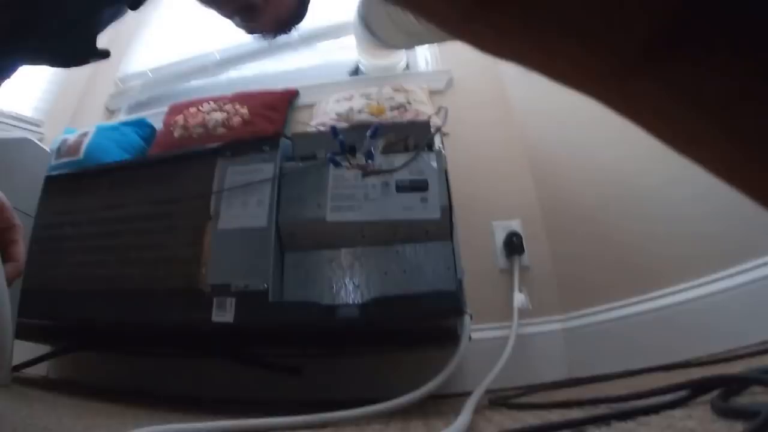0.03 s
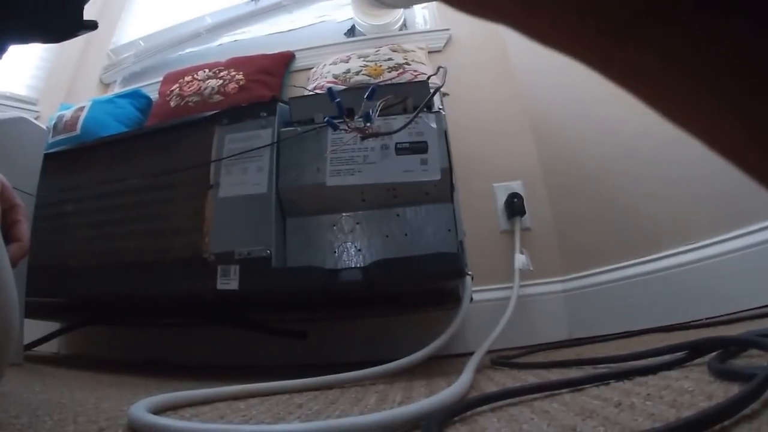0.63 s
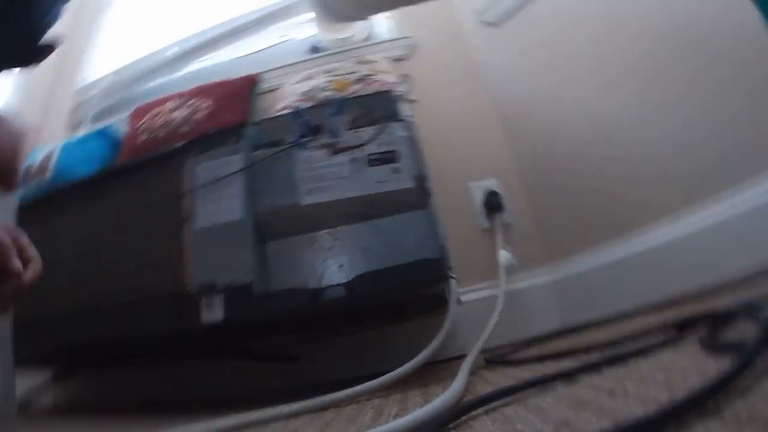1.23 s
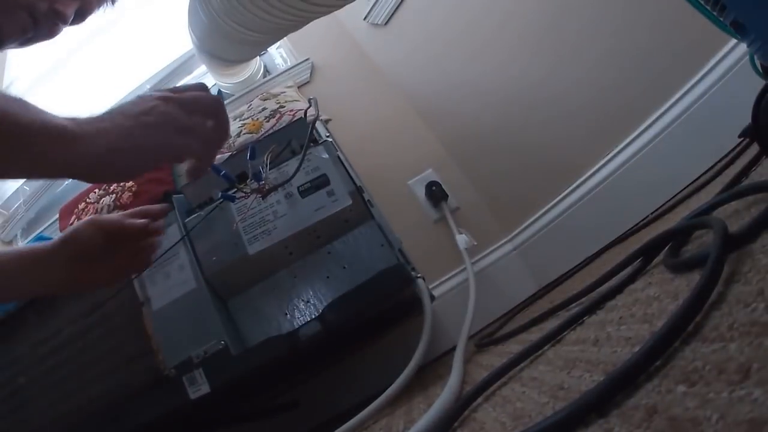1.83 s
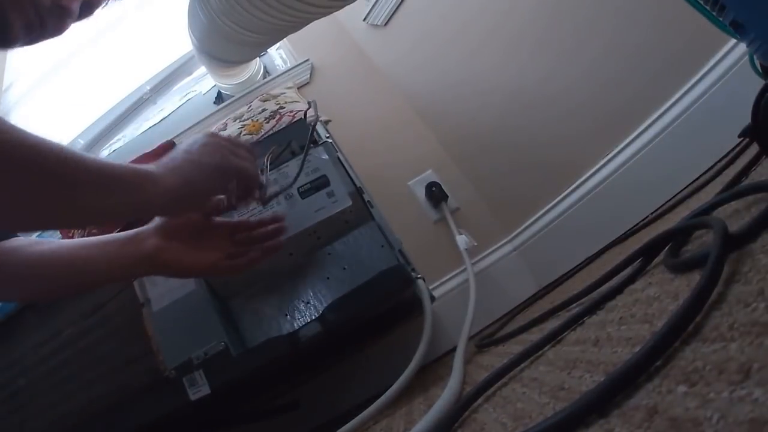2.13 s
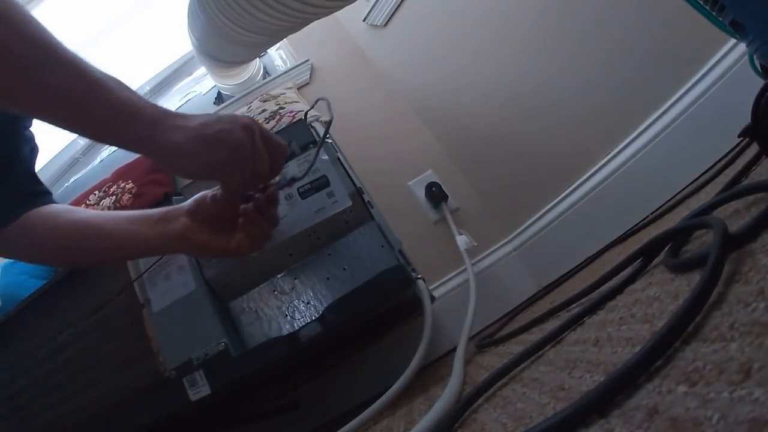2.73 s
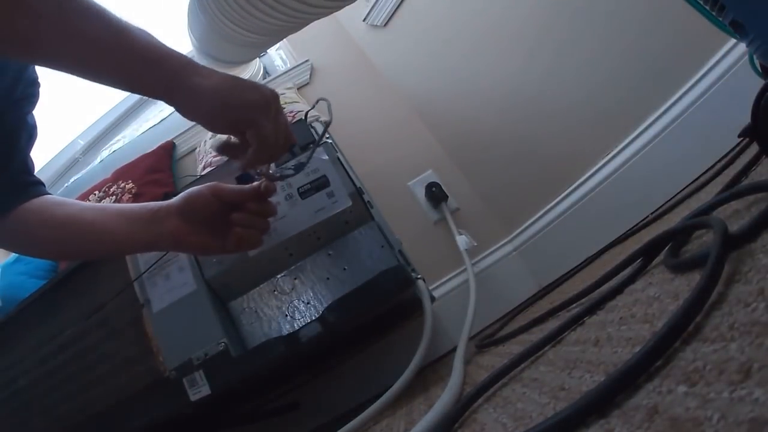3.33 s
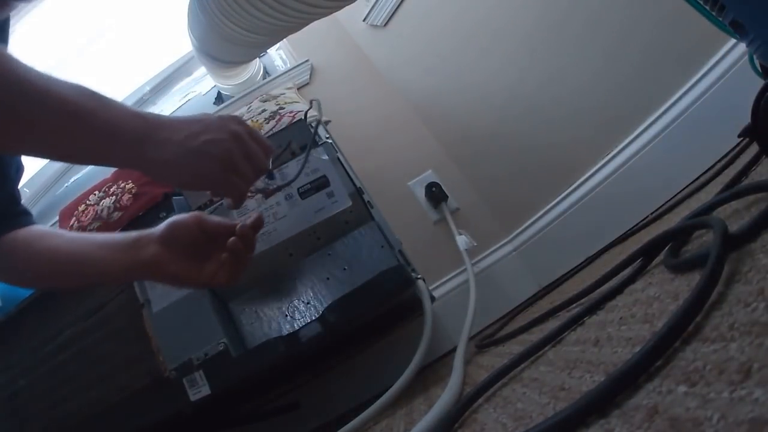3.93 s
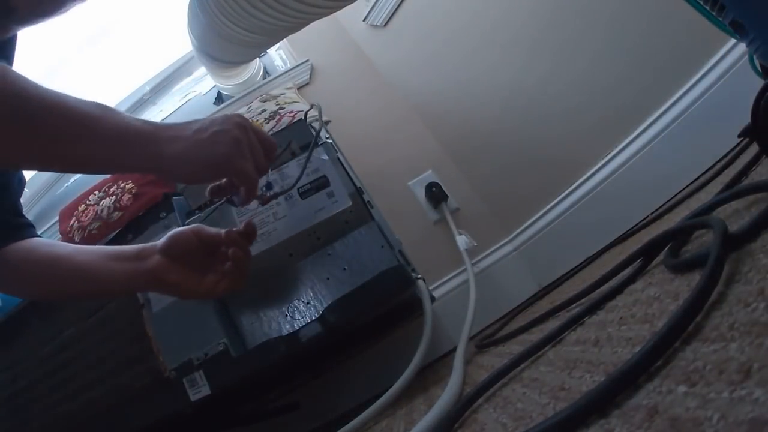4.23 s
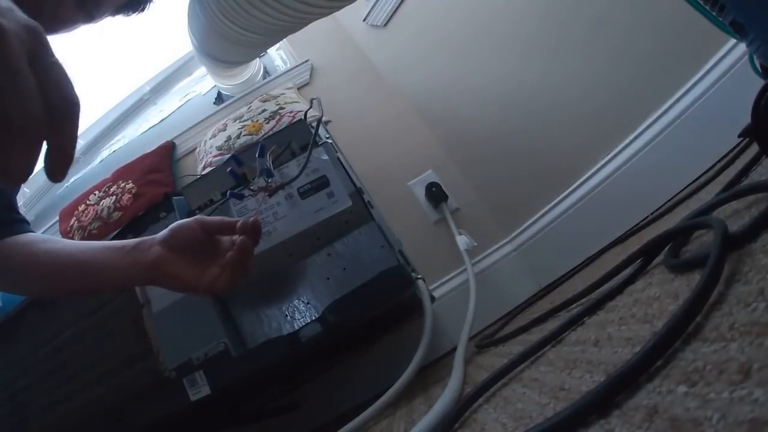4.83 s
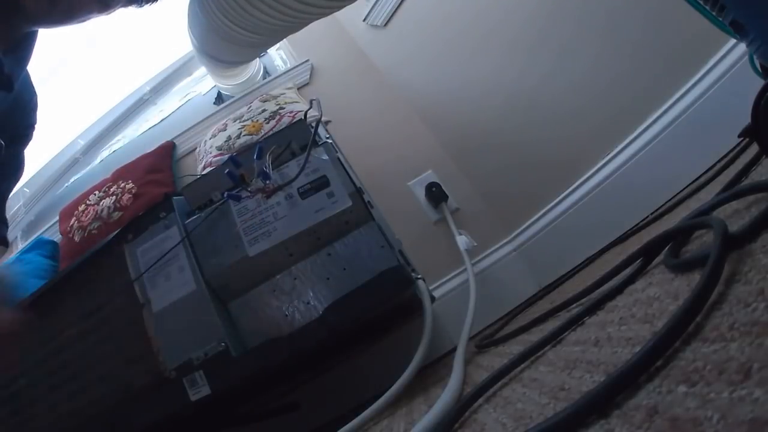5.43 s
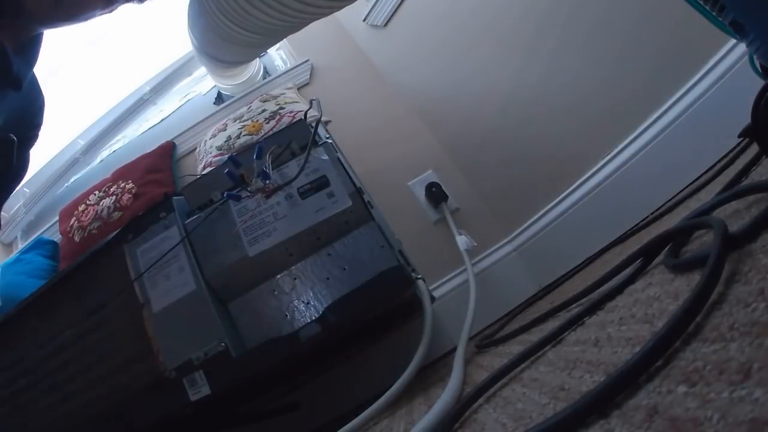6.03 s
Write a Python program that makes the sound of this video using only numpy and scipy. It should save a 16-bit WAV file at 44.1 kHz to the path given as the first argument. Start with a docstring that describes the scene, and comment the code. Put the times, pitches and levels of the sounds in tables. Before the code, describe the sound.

A wall air conditioner runs for all six seconds in a small room: a low, slightly throbbing hum with rushing fan air, faint panel buzz and a thin hiss. The microphone starts in the hand, with a clack right at the start, finger rubbing, and a few light bumps around 0.6 seconds. At about 1.4 seconds it scrapes over the floor and stops with a loud, sharp knock at 1.5, followed by a plastic clack at 1.6. The background drops at the knock and recovers over the next couple of seconds, with the hum stronger from the floor. Wires and small parts tick lightly near 1.7 and 1.8 seconds, faintly again around 4.1 and 4.4, and near 5.9. Soft, low thuds come through the floor at scattered moments. Clothes brush and a sleeve swishes quietly from about 4.7 to 5.5 seconds.

```python
"""A small room, heard from a camera's microphone. An opened wall air conditioner runs throughout:
compressor and mains hum beat against each other over the fan's rush and a faint buzz of panels.
At first the camera is in the hand, rubbed and bumped. Near 1.4 s it scrapes over the floor and stops
with a knock that ducks its gain control; its mount clacks, and the level takes seconds to recover.
Then, from the floor, we hear someone handle the wiring: small ticks, brushing clothes, soft thuds."""
import sys
import numpy as np
from scipy import signal
from scipy.fft import rfft, irfft, next_fast_len
from scipy.io import wavfile
from scipy.ndimage import uniform_filter1d, minimum_filter1d

SR = 44100
rng = np.random.default_rng(int(sys.argv[2]) if len(sys.argv) > 2 else 0)


def generate_wav(signal):
    """Clip the signal to [-1, 1] and save it as 16-bit WAV at the path in sys.argv[1]."""
    frames = np.transpose(np.atleast_2d(signal))
    scaled = np.clip(frames, -1, 1) * 32767
    pcm = np.round(scaled).astype(np.int16)
    wavfile.write(sys.argv[1], SR, pcm)


N = 268260
TIME = np.arange(N) / SR
SHAFT_HZ, MAINS_HZ = 56.39, 60.0
# In the hand the microphone gets less hum and more air: levels against its place on the floor.
CARRIED_HUM_DB, CARRIED_BOOM_DB, CARRIED_RUSH_DB, CARRIED_HISS_DB = -6.5, 2.5, 0, 1
HUM_COLUMN, BOOM_COLUMN, RUSH_COLUMN = 2, 3, 4  # of LEVEL_SWINGS

# Brief dips and swells of hum, boom and rush, some deepening the drop after the knock.
# Each row: centre in seconds, length in seconds, change of hum, of boom and of rush in dB.
LEVEL_SWINGS = [(0.205, 0.68, -1, -3, -3), (0.55, 0.12, 4, 3.5, -1), (1.185, 0.43, 0, 1, 2),
                (1.566, 0.11, 1, -3.5, -2.5), (1.73, 0.22, -2, 1.5, 1.5), (1.93, 0.49, -0.5, -6.5, -3),
                (2.23, 0.48, -2.5, 5, 1), (3.615, 0.27, -7.5, 1.5, -0.5), (4.757, 0.33, -6, 0.5, 0),
                (5.738, 0.51, -1.5, -3, -1)]
# Refrigerant hiss. Each row: frequency in Hz, relative level in dB.
GAS_SPECTRUM = [(1000, -14), (2100, 13.5), (2500, 1.5), (3000, 10), (4200, 3.5), (4800, 5.5), (5850, 6.5),
                (6500, -3.5), (7500, -11), (8700, -15), (10200, -23), (11300, -20), (12700, -11.5),
                (14000, -22), (15000, -44)]
# Buzzing panels. Each row: frequency in Hz, relative level of the lines there in dB.
PANEL_SPECTRUM = [(450, -2), (620, 1.5), (850, 1.5), (1050, 0.5), (1350, -5.5), (1660, -8.5)]
# Fan and casing tones. Each row: frequency in Hz, level in dB.
FAN_TONES = [(59.1, -50), (137.0, -49), (230.8, -38), (295.5, -45), (367.2, -43.5), (804.0, -59.5)]
# Air booming in the casing. Each row: frequency in Hz, relative level in dB.
BOOM_SPECTRUM = [(15, -35.5), (40, -22), (70, -21), (100, -15), (150, -0.5), (195, -6.5), (250, -4),
                 (325, 3.5), (375, -5.5), (440, -13), (600, -22), (1200, -68), (14000, -89.5)]
# Air rushing through the fins. Each row: frequency in Hz, relative level in dB.
RUSH_SPECTRUM = [(250, -30), (480, 7), (620, 1.5), (900, -3.5), (1050, -3.5), (1400, -5), (1650, -9.5),
                 (2000, -14.5), (2500, -18.5), (4500, -57)]
# Compressor hum. Each row: multiple of the shaft rate, level in dB.
SHAFT_ORDERS = [(0.5, -54.5), (1.5, -44.5), (2, -25), (2.5, -50.5), (3, -59.5), (4, -45), (5, -38),
                (7, -48.5), (8, -54), (9, -49.5), (10, -55), (10.5, -60), (12, -58.5), (14, -59), (24, -60),
                (33, -64.5)]
# Brief dips of the deepest hum. Each row: centre in seconds, length in seconds, change in dB.
DEEP_DIPS = [(2.29, .13, -18), (3.0, 0.089, -13), (3.75, .25, 0), (4.12, 0.11, -10), (5.1, .28, -22),
             (5.58, 0.14, -14)]
# The motor's magnetic hum. Each row: multiple of the mains, level in dB.
MAINS_HARMONICS = [(2, -40), (4, -46), (6, -43)]
# The rotor modulates twice the mains. Each row: shaft multiples above that tone, level in dB.
ROTOR_SIDEBANDS = [(1, -46.5), (2, -40.5), (4, -41)]
# Weight shifting on the floor. Each row: peak in seconds, length in seconds, level in dB.
FLOOR_THUDS = [(0.065, 0.14, -35), (0.264, 0.12, -31), (0.55, 0.096, -33), (0.706, 0.043, -22),
               (1.023, 0.15, -31.5), (1.39, 0.064, -26.5), (1.533, 0.049, -24.5), (1.907, 0.13, -28),
               (2.052, 0.085, -33), (2.187, 0.049, -24), (3.313, 0.18, -31), (3.487, 0.058, -28),
               (4.014, 0.37, -39.5), (4.287, 0.14, -27), (4.565, 0.12, -28.5), (4.692, 0.087, -29.5),
               (5.384, 0.042, -24.5)]
# The floor's rumble. Each row: frequency in Hz, relative level in dB.
FLOOR_SPECTRUM = [(15, -4), (35, -8.5), (55, 1.5), (85, 1.5), (120, -2.5), (165, -7.5), (205, -23),
                  (400, -62), (1000, -88.5)]
# Clothes brush as the arms move. Each row: peak, rise and fall in seconds, level in dB.
CLOTH_STROKES = [(.62, 0.17, 0.39, -51.5), (2.88, 0.045, 0.073, -60), (4.765, 0.035, 0.16, -43),
                 (5.41, 0.018, 0.16, -49.5)]
# Fabric on skin. Each row: frequency in Hz, relative level in dB.
CLOTH_SPECTRUM = [(800, 6.5), (2000, 3), (3900, -5.5), (4500, 0), (5850, -2), (6500, -9), (7500, -13),
                  (8500, -12.5), (10500, -22.5), (13000, -21), (15000, -33)]
# A sleeve swishes as the arm draws back. Each row: peak, rise and fall in seconds, level in dB.
SLEEVE_STROKES = [(4.74, 0.013, 0.16, -52.5), (4.93, 0.11, 0.2, -57)]
# The sliding sleeve. Each row: frequency in Hz, relative level in dB.
SLEEVE_SPECTRUM = [(2500, -17), (4050, -14), (4350, 0.5), (4900, 3.5), (5500, 6), (6100, -2), (7000, -19.5),
                   (8400, -13), (10000, -27.5), (14000, -33)]
# Wires and small parts tick. Each row: start in seconds, ring level in dB, ring pitch in Hz,
# ring t60 in seconds, snap level in dB, snap t60 in seconds.
WIRE_TICKS = [(1.6825, -31, 3040, 0.013, -49, .013), (1.8122, -29, 2880, 0.027, -34, 0.021),
              (4.109, -50, 3020, .01, -46, .013), (4.416, -37, 4740, 0.006, -39, 0.045),
              (5.893, -38.5, 2900, 0.0097, -48, .013)]
# The camera's shell. Each row: frequency in Hz, relative level in dB, t60 in seconds.
SHELL_MODES = [(406, -10.5, 0.032), (1030, -8.5, 0.017), (1705, -1, 0.011), (1890, 0.5, 0.012),
               (2230, -1.5, 0.012), (2680, -4, 0.0062), (2990, 1.5, 0.0069), (4160, -9, 0.0033),
               (4820, -15.5, 0.0078), (5620, -6.5, 0.0057), (8500, -24.5, 0.0043), (9100, -29, 0.0067),
               (12800, -14, .002)]
# Its loose mount. Each row: frequency in Hz, relative level in dB, t60 in seconds.
MOUNT_MODES = [(307, -2.5, 0.038), (1090, -7, 0.0078), (1520, -1, 0.0092), (1840, 5.5, 0.0074),
               (2260, -2, 0.013), (2690, 1.5, 0.005), (2900, 3, 0.0093), (3950, -5.5, 0.0076),
               (4280, -2.5, 0.0061), (5200, -3.5, 0.0029), (5770, -12.5, 0.0094)]
# The camera slides in quickening shoves. Each row: peak, rise and fall in seconds, relative level in dB.
SHOVES = [(1.448, 0.063, 0.015, -30.5), (1.483, 0.03, 0.012, -24), (1.505, 0.015, 0.009, -23.5)]
# Resonances of the slide. Each row: frequency in Hz, nominal width in Hz, relative level in dB.
CHATTER_BANDS = [(1790, 81, -11.5), (2023, 270, 3), (2205, 170, -3.5), (2560, 180, -5.5), (2920, 370, -10)]
# The camera's body drags on the floor. Each row: peak, rise and fall in seconds, level in dB.
DRAG_STROKES = [(1.39, 0.05, 0.061, -29), (1.5, 0.034, 0.02, -37)]
# The grumble of that drag. Each row: frequency in Hz, relative level in dB.
DRAG_SPECTRUM = [(100, -8.5), (215, -12), (300, 9), (500, 3.5), (750, -8.5), (1100, -7), (1500, -15),
                 (3000, -43), (14000, -69)]
# Fingers on the camera. Each row: peak, rise and fall in seconds, relative level in dB.
FINGER_STROKES = [(.042, 0.016, 0.025, -37), (.108, 0.043, 0.024, -34.5), (.15, 0.03, 0.038, -29),
                  (.29, 0.024, 0.036, -47), (.533, 0.062, 0.1, -40.5), (.678, 0.0095, 0.016, -40)]
# Skin dragging on plastic. Each row: frequency in Hz, relative level in dB.
SKIN_SPECTRUM = [(200, -17), (700, -16), (1300, 6), (2000, -10), (2750, 2.5), (3300, -10), (4500, -12.5),
                 (5700, -8), (7200, -26), (8100, -19), (10300, -36.5), (13000, -27), (14500, -50)]
# Knocks on the camera. Each row: start in seconds, shell peak in dB, low push in dB, contact cutoff
# in Hz, hollow ring of the struck spot in Hz, its level in dB, snap level in dB.
SHELL_KNOCKS = [(.566, -38, -50, 7000, 5560, -41, -52), (0.5752, -27, -27, 1700, 1290, -27, -60),
                (0.6096, -23.5, -40, 4500, 1610, -23, -36), (0.6806, -31, -30, 5500, 1700, -42, -41),
                (1.3748, -34, -27, 7000, 5630, -43, -47), (1.4308, -31, -30, 7000, 1990, -34, -45),
                (1.4655, -31, -37, 7000, 2000, -34, -45), (1.5154, 5, 15, 9200, 2090, -3.5, -6)]
# The mount hits its stop. Each row: start in seconds, clack peak in dB, low push in dB.
MOUNT_CLACKS = [(.043, -10.5, -2), (1.6249, -5, -30), (1.6262, -21, -23), (1.6275, -16.5, 0.5)]
# The camera's own hiss. Each row: frequency in Hz, relative level in dB.
SELF_NOISE_SPECTRUM = [(500, 4), (2000, 10), (4200, -3.5), (5800, 2.5), (6800, -17), (8500, -20),
                       (10000, -29.5), (14000, -38)]


def gain_of(db):
    """Decibels to amplitude."""
    return 10 ** (np.asarray(db) / 20)


def unit_rms(x):
    """Scales to rms 1."""
    return x / np.sqrt(np.mean(x ** 2) + 1e-20)


def unit_peak(x):
    """Scales to peak 1."""
    return x / abs(x).max()


def add(mix, start_s, sound):
    """Mixes a sound in at a time."""
    part = mix[max(round(start_s * SR), 0):][:len(sound)]
    part += sound[:len(part)]


def noise(spectrum, ripple_db=0.0):
    """Coloured noise of rms 1; reflections leave fine, steady ripples in it above 800 Hz."""
    hz, db = np.transpose(spectrum)
    size = next_fast_len(N)
    bins_hz = np.fft.rfftfreq(size, 1 / SR)
    knots_hz = np.arange(0, SR / 2, 70)
    ripple = np.interp(bins_hz, knots_hz, rng.standard_normal(len(knots_hz)) * (knots_hz > 800))
    colour = gain_of(np.interp(np.log(bins_hz + 1), np.log(hz), db) + ripple_db * ripple)
    return unit_rms(irfft(rfft(rng.standard_normal(size)) * colour, size)[:N])


def drift(rate_hz):
    """A random wander of rms about 1, no faster than about rate_hz."""
    t = np.linspace(0, TIME[-1], 1200)
    hz = rate_hz * np.geomspace(1 / 10, 1, 16)
    waves = np.sin(2 * np.pi * (t[:, None] * hz + rng.random(len(hz))))
    return np.interp(TIME, t, unit_rms(waves.sum(1)))


def tone(turns, db):
    """A sine of the given rms level that starts anywhere in its cycle."""
    return np.sqrt(2) * gain_of(db) * np.sin(2 * np.pi * (turns + rng.random()))


def swell(centre_s, length_s):
    """A smooth bump of height 1 around a time."""
    return np.exp(-(2 * (TIME - centre_s) / length_s) ** 2)


def strokes(rows):
    """Gain of rubbing strokes: each rises smoothly to its peak, then dies away."""
    gain = np.zeros(N)
    for peak_s, rise_s, fall_s, db in rows:
        before, after = np.minimum(TIME - peak_s, 0), np.maximum(TIME - peak_s, 0)
        gain += gain_of(db) * np.exp(-(before / rise_s) ** 2 - after / fall_s)
    return gain


def ringing(modes):
    """Dying sines of a struck part, alternating in sign."""
    t = TIME[:SR // 10]
    return sum((-1) ** k * gain_of(db - 60 * t / t60) * np.sin(2 * np.pi * hz * t)
               for k, (hz, db, t60) in enumerate(modes))


def pickup(carried_db, column, rest_s=1.8, move_s=0.3):
    """Gain of a layer as the microphone goes from hand to floor, with brief dips and swells."""
    in_hand = np.clip((rest_s - TIME) / move_s, 0, 1)
    swing_db = sum(row[column] * swell(row[0], row[1]) for row in LEVEL_SWINGS)
    return gain_of(carried_db * in_hand + swing_db)


def refrigerant(shaft, mains, hiss_db=-56.5, spurt_db=1.3, throb_db=1.2):
    """Gas hisses in spurts, one a turn, and swells with the motor's throb."""
    spurts = spurt_db * np.sin(2 * np.pi * shaft)
    throb = throb_db * np.sin(2 * np.pi * 2 * (shaft - mains))
    hiss = noise(GAS_SPECTRUM, ripple_db=1.2) * gain_of(hiss_db + spurts + throb)
    return hiss * pickup(CARRIED_HISS_DB, RUSH_COLUMN)


def panel_buzz(shaft, buzz_db=-47.0, uneven_db=1.6, waver_db=1.5):
    """Loose panels repeat the same rattle every second turn: a close comb of midrange lines."""
    hz, db = np.transpose(PANEL_SPECTRUM)
    orders = np.arange(15, 60) / 2
    levels_db = np.interp(orders * SHAFT_HZ, hz, db) + uneven_db * rng.standard_normal(len(orders))
    two_turns = np.linspace(0, 2, 2048)
    rattle = unit_rms(sum(tone(k * two_turns, level) for k, level in zip(orders, levels_db)))
    buzz = np.interp(shaft % 2, two_turns, rattle) * gain_of(buzz_db + waver_db * drift(9))
    return buzz * pickup(CARRIED_RUSH_DB, RUSH_COLUMN)


def fan(boom_db=-34.0, rush_db=-44.0, gust_db=1.02, wander_turns=0.065):
    """Turbulent air booms in the casing and rushes through the fins; the flow makes its tones waver."""
    tones = sum(tone(hz * TIME + wander_turns * drift(4), db) for hz, db in FAN_TONES)
    gusts = gust_db * drift(12)
    boom = noise(BOOM_SPECTRUM) * gain_of(boom_db + gusts)
    rush = noise(RUSH_SPECTRUM, ripple_db=1.0) * gain_of(rush_db + gusts)
    casing = (boom + tones) * pickup(CARRIED_BOOM_DB, BOOM_COLUMN)
    return casing + rush * pickup(CARRIED_RUSH_DB, RUSH_COLUMN)


def compressor(shaft, mains, deep_db=-32.5, waver_db=1.0):
    """Shaft and magnetic hum; the rotor lags the mains, so they throb about seven times a second."""
    dips_db = sum(db * swell(s, length) for s, length, db in DEEP_DIPS)
    deep = tone(shaft, deep_db) * gain_of(dips_db)
    orders = sum(tone(k * shaft, db) for k, db in SHAFT_ORDERS)
    magnetic = sum(tone(k * mains, db) for k, db in MAINS_HARMONICS)
    sidebands = sum(tone(2 * mains + k * shaft, db) for k, db in ROTOR_SIDEBANDS)
    hum = (deep + orders + magnetic + sidebands) * gain_of(waver_db * drift(4.4))
    return hum * pickup(CARRIED_HUM_DB, HUM_COLUMN)


def floor_thuds(tremor_db=-43.0):
    """Soft swells of rumble reach the microphone through the floor, over a faint steady tremor."""
    thuds = sum(gain_of(db) * swell(s, length) for s, length, db in FLOOR_THUDS)
    rumble = noise(FLOOR_SPECTRUM)
    running_rms = np.sqrt(uniform_filter1d(rumble ** 2, size=3000))
    return (gain_of(tremor_db) + thuds) * rumble / running_rms


def clothing(grain_db=1.5):
    """Fabric brushes and a sleeve slides: fine, slightly uneven hisses."""
    brush = noise(CLOTH_SPECTRUM, ripple_db=3.0) * strokes(CLOTH_STROKES)
    swish = noise(SLEEVE_SPECTRUM, ripple_db=1.5) * strokes(SLEEVE_STROKES)
    return (brush + swish) * gain_of(grain_db * drift(84))


def wiring(snap_band_hz=(3300, 6200)):
    """Each tick is a dry snap and one short ring of the part that was touched."""
    out, t = np.zeros(N), TIME[:SR // 10]
    band = signal.butter(3, snap_band_hz, "bandpass", fs=SR, output="sos")
    for s, ring_db, hz, t60, snap_db, snap_t60 in WIRE_TICKS:
        burst = rng.standard_normal(len(t)) * gain_of(-60 * t / snap_t60)
        snap = gain_of(snap_db) * unit_peak(signal.sosfilt(band, burst))
        add(out, s, ringing([(hz, ring_db, t60)]) + snap)
    return out


def contact_snap(band_hz=(3400, 9300)):
    """The dry click of a hard contact, peak 1."""
    band = signal.butter(2, band_hz, "bandpass", fs=SR, output="sos")
    return unit_peak(signal.sosfilt(band, signal.unit_impulse(SR // 10)))


def shell_ring(contact_hz):
    """The camera shell's answer to one tap, peak 1; a softer contact leaves out the high modes."""
    softness = signal.butter(2, contact_hz, fs=SR, output="sos")
    return unit_peak(signal.sosfilt(softness, ringing(SHELL_MODES)))


def shell_rub(stroke_rows, contact_hz, clump_db, slips_per_s=9000):
    """Dense little slips, coming in clumps, ring the shell."""
    slips = rng.choice([-1, 1], N) * (rng.random(N) < slips_per_s / SR)
    clumped = slips * gain_of(clump_db * drift(140))
    rubbing = signal.oaconvolve(clumped, shell_ring(contact_hz))[:N]
    return unit_rms(rubbing) * strokes(stroke_rows)


def camera_scrape(shell_db=-2.0, chatter_db=-4.5, rough_db=4.5, stop_s=1.523, stopping_s=0.008):
    """The camera drags over the floor: its body grumbles, and slips make the shell ring and chatter."""
    friction = rng.standard_normal(N) * gain_of(rough_db * drift(120))
    resonances = np.zeros(N)
    for hz, width_hz, db in CHATTER_BANDS:
        b, a = signal.iirpeak(hz, hz / (1.5 * width_hz), fs=SR)
        resonances += gain_of(db) * unit_rms(signal.lfilter(b, a, signal.lfilter(b, a, friction)))
    chatter = gain_of(chatter_db) * unit_rms(resonances) * strokes(SHOVES)
    slips = gain_of(shell_db) * shell_rub(SHOVES, contact_hz=5600, clump_db=2.0)
    grumble = noise(DRAG_SPECTRUM) * strokes(DRAG_STROKES)
    sliding = np.clip((stop_s - TIME) / stopping_s, 0, 1)
    return sliding * (slips + chatter + grumble)


def camera_handling(push_hz=88, push_t60=0.0088, spot_t60=0.021, shell_db=-5.5, skin_db=-6.5):
    """Right at the microphone, fingers rub the shell; knocks ring it or the mount and push the body."""
    out = shell_rub(FINGER_STROKES, contact_hz=5940, clump_db=4.0) * gain_of(shell_db)
    skin = noise(SKIN_SPECTRUM, ripple_db=3.0) * strokes(FINGER_STROKES)
    out += skin * gain_of(skin_db + 2.5 * drift(130))
    push = ringing([(push_hz, 0, push_t60)])
    for s, db, push_db, contact_hz, spot_hz, spot_db, snap_db in SHELL_KNOCKS:
        shell = gain_of(db) * shell_ring(contact_hz)
        hollow = ringing([(spot_hz, spot_db, spot_t60)])
        add(out, s, shell + hollow + gain_of(push_db) * push + gain_of(snap_db) * contact_snap())
    clack = unit_peak(ringing(MOUNT_MODES))
    for s, db, push_db in MOUNT_CLACKS:
        add(out, s, gain_of(db) * clack + gain_of(push_db) * push)
    return out


def scene(wander_turns=0.0053):
    """The running air conditioner and the handling around it, at one microphone."""
    shaft = SHAFT_HZ * TIME + wander_turns * drift(1.478)  # both phases count turns
    mains = MAINS_HZ * TIME
    machine = compressor(shaft, mains) + fan() + panel_buzz(shaft) + refrigerant(shaft, mains)
    return (machine + floor_thuds() + camera_handling() + camera_scrape() + wiring() + clothing())[None]


def gain_control(sound, threshold_db=-13, hold_s=0.017, recover_s=0.91):
    """The camera's gain drops at once on a loud blow, holds, and creeps back."""
    power = uniform_filter1d(sound[0] ** 2, size=88)
    over_db = np.maximum(10 * np.log10(abs(power) + 1e-12) - threshold_db, 0)
    hold = 2 * int(hold_s * SR / 2) + 1
    held_db = -minimum_filter1d(-over_db, hold, origin=hold // 2, mode="constant")
    recovery = np.exp(-TIME / recover_s)
    cut_db = np.maximum.accumulate(held_db / recovery) * recovery
    return sound * gain_of(-uniform_filter1d(cut_db, size=32))


def limiter(sound, ceiling_db=-14):
    """Single peaks are turned down smoothly over about a millisecond."""
    allowed_gain = np.minimum(gain_of(ceiling_db) / (abs(sound) + 1e-9), 1)
    return sound * uniform_filter1d(minimum_filter1d(allowed_gain, size=65), size=65)


def record(dry, hiss_db=-62, edge_hz=14600):
    """Behind the microphone: gain control, the camera's own unducked hiss, limiter and band limit."""
    hiss = noise(SELF_NOISE_SPECTRUM) * gain_of(hiss_db)
    limited = limiter(gain_control(dry) + hiss)
    low_pass = signal.firwin(255, edge_hz, window=("kaiser", 9), fs=SR)
    return signal.oaconvolve(limited, low_pass[None], "same")


dry = scene()
out = record(dry)
generate_wav(out)
```